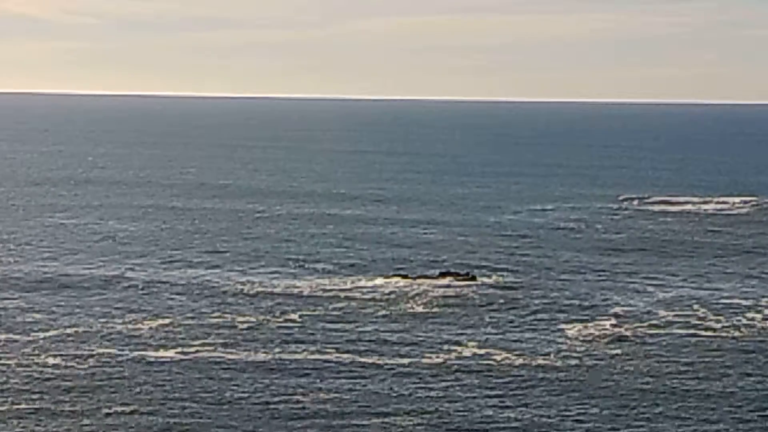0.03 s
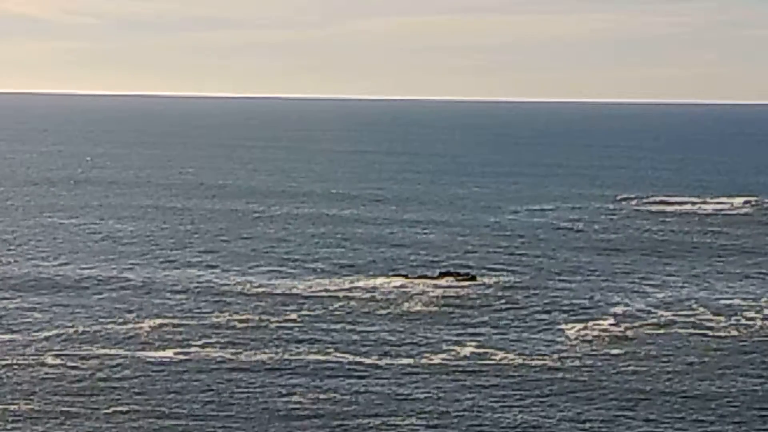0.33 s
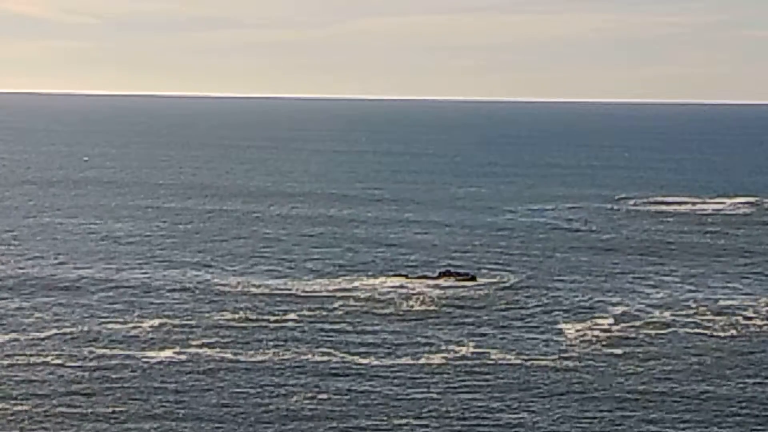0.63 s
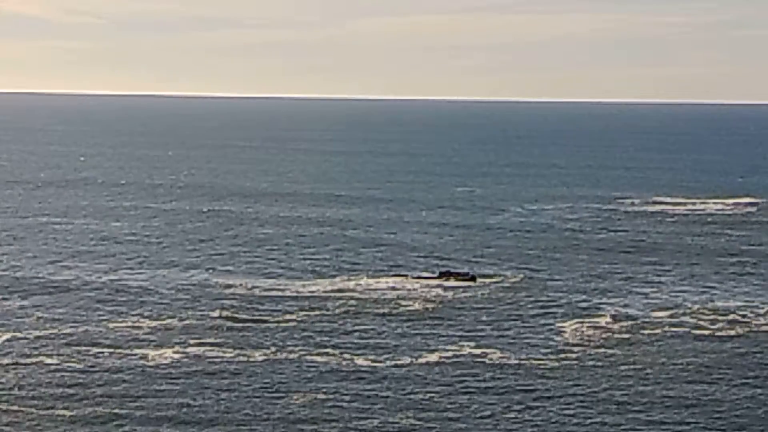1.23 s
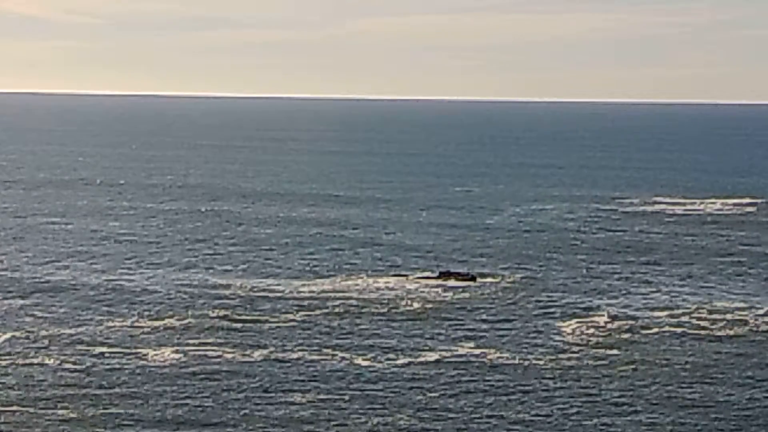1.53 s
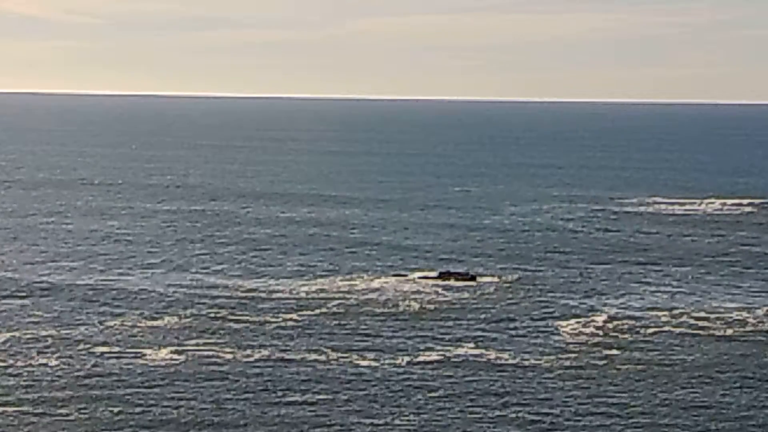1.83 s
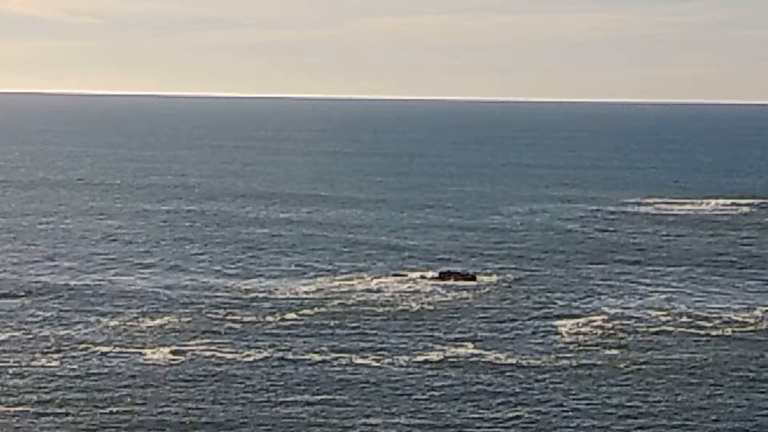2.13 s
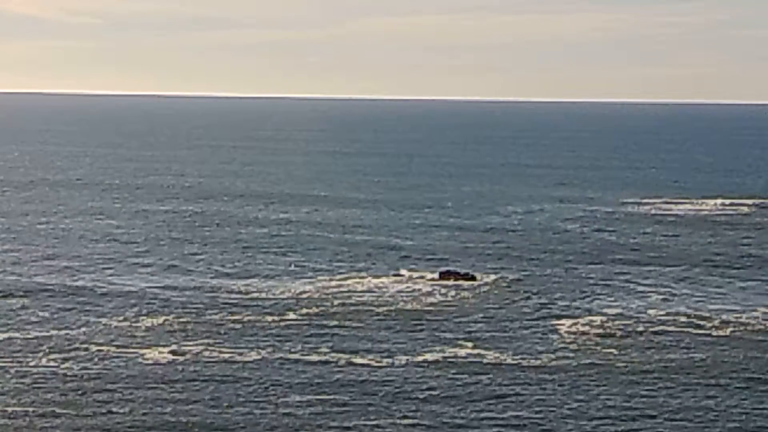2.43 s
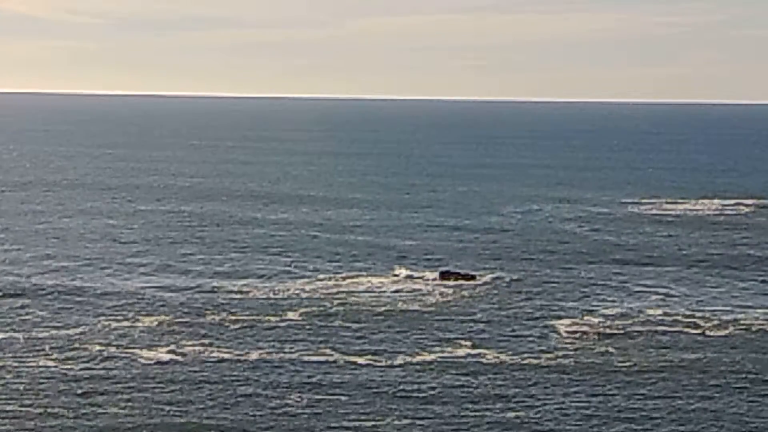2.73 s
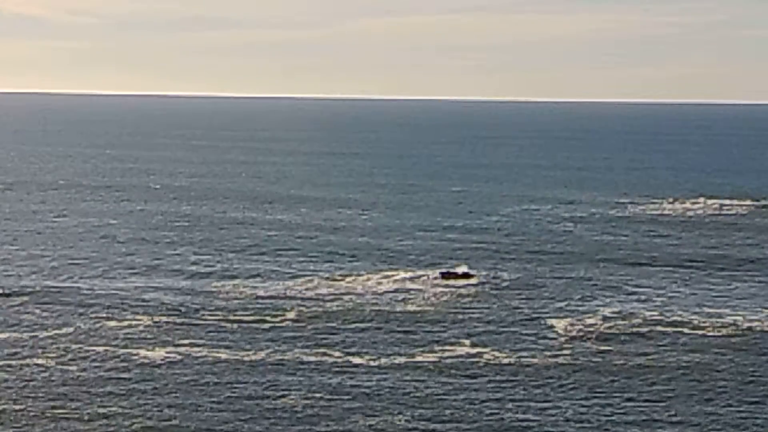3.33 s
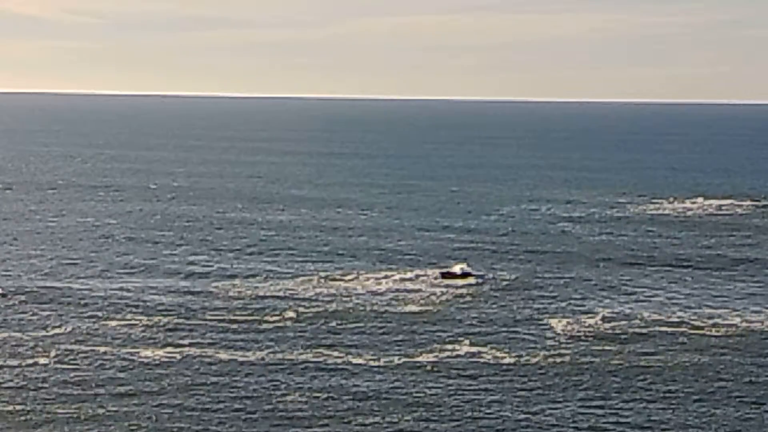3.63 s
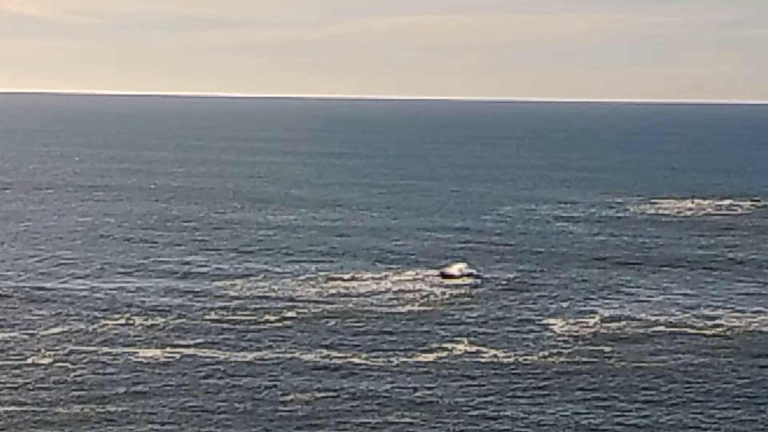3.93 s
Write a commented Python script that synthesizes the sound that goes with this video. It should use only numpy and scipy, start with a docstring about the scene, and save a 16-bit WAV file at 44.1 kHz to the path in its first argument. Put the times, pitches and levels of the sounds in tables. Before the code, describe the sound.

Far-off waves breaking on rocks merge into one soft, even roar that swells only slightly. A muffled hiss of foam and a faint wind rumble run alongside it, picked up by a microphone high above the water.

```python
"""High above the open sea, one microphone far from the surf.
Many breakers on rocks and shoals merge into one slowly swelling roar, with a deeper wash of falling
water under it and a dull hiss of foam over it. Light wind rumbles below. At this distance the air
has taken most of the treble, and the microphone adds a faint hiss of its own."""
import sys
import numpy as np
from scipy import signal
from scipy.fft import rfft, irfft, next_fast_len
from scipy.io import wavfile
from scipy.ndimage import uniform_filter1d, map_coordinates

SR = 44100
rng = np.random.default_rng(int(sys.argv[2]) if len(sys.argv) > 2 else 0)


def log_audio(samples):
    """Write samples as a 16-bit WAV file to the path given in sys.argv[1]."""
    # one column per channel
    frames = np.atleast_2d(samples).T
    # limit to full scale, then quantise
    limited = np.clip(frames, -1, 1)
    pcm = np.round(limited * 32767).astype(np.int16)
    wavfile.write(sys.argv[1], SR, pcm)


N = 176400  # 4 s


def amp(db):
    """Decibels to gain."""
    return 10 ** (np.asarray(db) / 20)


def unit(x):
    """x at rms 1."""
    return x / np.sqrt(np.mean(x ** 2) + 1e-20)


def along(points, hz):
    """(frequency [Hz], value) points read on a log frequency axis."""
    freqs, values = np.transpose(points)
    return np.interp(np.log(hz + 1), np.log(freqs + 1), values)


def curve(rows):
    """(time [s], value) rows as one value per sample."""
    times, values = np.transpose(rows)
    return np.interp(np.arange(N) / SR, times, values)


def wobble(rate):
    """A smooth random curve, rate knots a second."""
    knots = rng.standard_normal(1024)
    return map_coordinates(knots, [np.arange(N) * rate / SR], mode="wrap")


def filtered(x, response):
    """x through a filter whose gain is response(hz)."""
    padded = next_fast_len(N + SR // 2)
    hz = np.fft.rfftfreq(padded, 1 / SR)
    return irfft(rfft(x, padded) * response(hz), padded)[:N]


def rush(spectrum, patchy_db):
    """Coloured noise of rms 1 with brief patches of random gain, falling steeply above its last point."""
    white = signal.stft(rng.standard_normal(N), nperseg=512)[2]
    patches = uniform_filter1d(rng.standard_normal(white.shape), size=5, axis=0)  # about 430 Hz wide
    patches = uniform_filter1d(patches, size=18, axis=1)  # about 0.1 s long
    noise = signal.istft(white * amp(patchy_db * unit(patches)), nperseg=512)[1][:N]
    skirt = lambda hz: np.maximum(hz / spectrum[-1][0], 1) ** -6
    return unit(filtered(noise, lambda hz: amp(along(spectrum, hz)) * skirt(hz)))


def breakers(gain_db=0.09):
    """The far roar swells with the waves and flutters slightly on its way through moving air."""
    # swell of the roar, before gain (time [s], level [dB])
    swell = [(0, -41), (0.25, -44.5), (0.45, -42), (0.65, -43), (1.05, -42), (1.4, -43.0), (1.85, -43),
             (2.15, -43.5), (2.45, -42.5), (2.9, -42.0), (3.2, -42.5), (3.55, -43.5), (3.75, -44),
             (4, -43.5)]
    # the roar from this height (frequency [Hz], relative level [dB])
    spectrum = [(600, -35.5), (780, -14.5), (860, -4), (950, -5), (1050, -2.5), (1330, -1), (1470, -1.5),
                (1630, -5), (1850, -6), (2150, -17.5), (2700, -28), (4500, -90.5)]
    level_db = gain_db + curve(swell) + 0.25 * wobble(rate=24)
    return amp(level_db) * rush(spectrum, patchy_db=0.5)


def wash(gain_db=-1.2):
    """Masses of falling water surge, deeper in pitch than the roar."""
    # surges of the wash, before gain (time [s], level [dB])
    surges = [(0, -51.5), (0.3, -50.5), (0.6, -50.5), (0.8, -49), (0.95, -50.5), (1.55, -51), (1.75, -51),
              (2.05, -52), (2.4, -50.5), (2.6, -51), (2.9, -49), (3.15, -50.5), (4, -50.5)]
    # low-mid body of the falling water (frequency [Hz], relative level [dB])
    spectrum = [(250, -35), (335, -17), (380, -8.5), (460, -5), (620, -3), (680, 1), (780, 0.5), (900, -9),
                (1300, -39.5)]
    return amp(gain_db + curve(surges)) * rush(spectrum, patchy_db=0.2)


def foam(gain_db=-0.31):
    """Countless bursting bubbles, smoothed into a dull hiss by the distance."""
    # drift of the foam's hiss, before gain (time [s], level [dB])
    drift = [(0, -60), (0.6, -60), (1.1, -59.5), (1.5, -60.5), (1.95, -60.4), (2.4, -60.0), (3.15, -59.5),
             (3.45, -61), (4, -61.6)]
    # foam dulled by the air (frequency [Hz], relative level [dB])
    spectrum = [(1200, -51), (2100, -20.5), (2750, -24.5), (3050, -21.5), (3550, -33.5), (3950, -35.5),
                (4250, -35), (5000, -43), (6000, -53), (6950, -56.5), (7350, -52.5), (8200, -64),
                (9500, -66.5), (11500, -85)]
    level_db = gain_db + curve(drift) + 0.2 * wobble(rate=32)
    return amp(level_db) * rush(spectrum, patchy_db=0.45)


def wind(mean_db=-62):
    """A light, even wind rumbles under the sound of the sea."""
    # rumble of the wind (frequency [Hz], relative level [dB])
    spectrum = [(8, -22.5), (25, -4), (55, 0), (150, 1.5), (230, 0), (330, 0), (500, -14), (1200, -48)]
    level_db = mean_db + 0.27 * wobble(rate=3.8)
    return amp(level_db) * rush(spectrum, patchy_db=0.56)


def scene():
    """Distant sea and wind at the microphone position, in mono."""
    return (breakers() + wash() + foam() + wind())[None]


def record(dry):
    """The microphone colours the sound, adds faint hiss and keeps nothing above its band limit."""
    # narrow resonances at the microphone (centre [Hz], width [Hz], boost [dB])
    peaks = [(1470, 47, 2.5), (4300, 230, 1), (7320, 120, 1.5)]
    hiss_db, top_hz = -98, 15750

    def colour(hz):
        return amp(sum(db / (1 + (2 * (hz - centre) / width) ** 2) for centre, width, db in peaks))

    coloured = filtered(dry[0], colour)
    hiss = amp(hiss_db) * rng.standard_normal(N)
    return filtered(coloured + hiss, lambda hz: hz < top_hz)[None]


dry = scene()
out = record(dry)
log_audio(out)
```